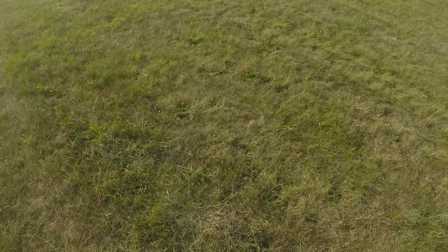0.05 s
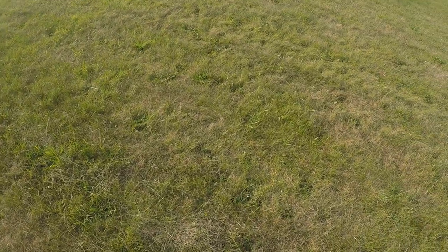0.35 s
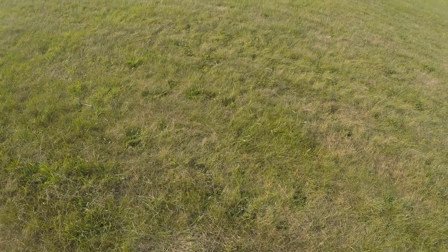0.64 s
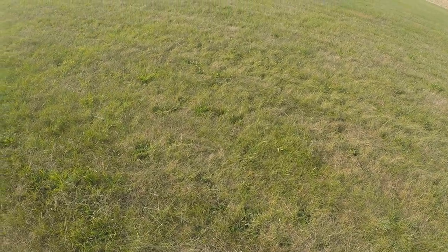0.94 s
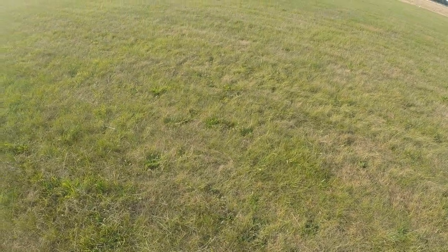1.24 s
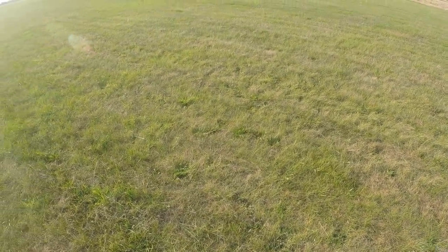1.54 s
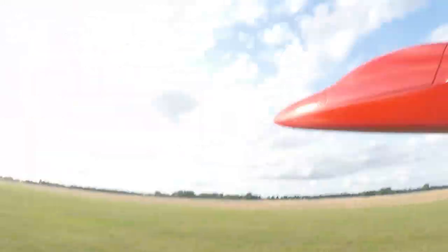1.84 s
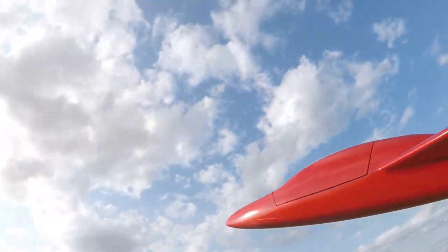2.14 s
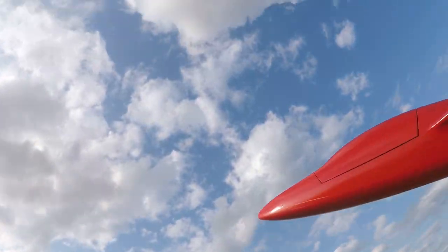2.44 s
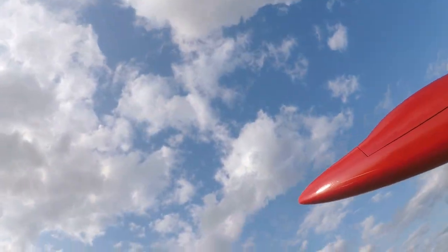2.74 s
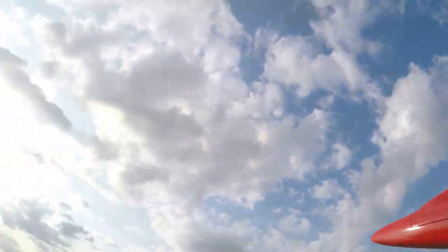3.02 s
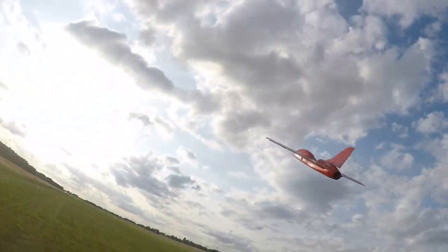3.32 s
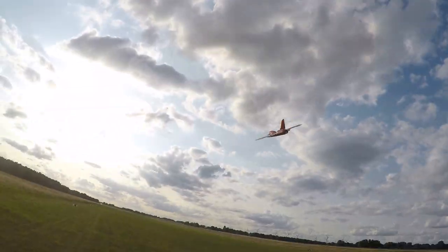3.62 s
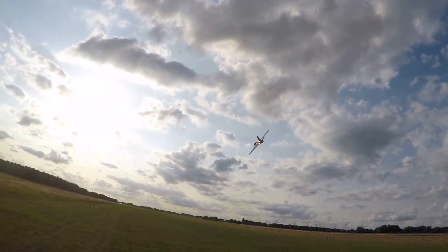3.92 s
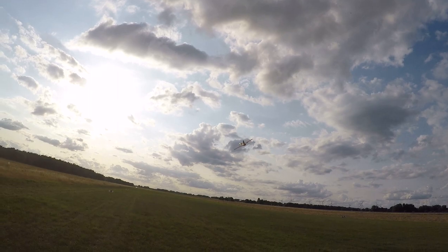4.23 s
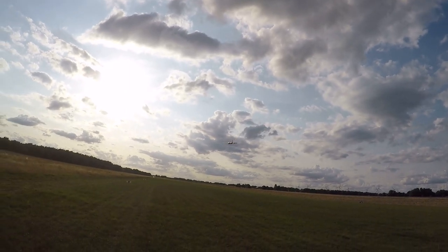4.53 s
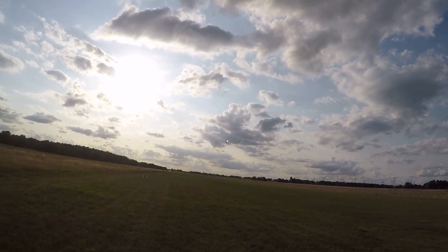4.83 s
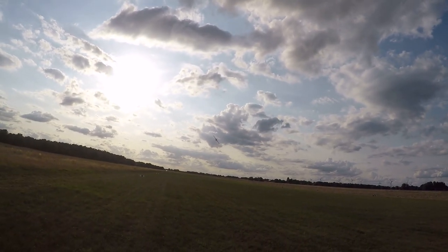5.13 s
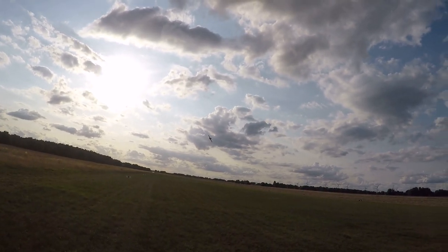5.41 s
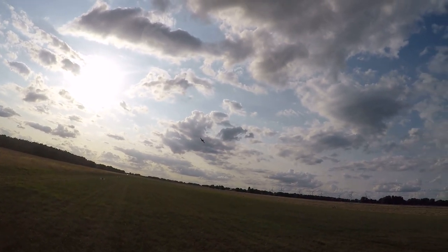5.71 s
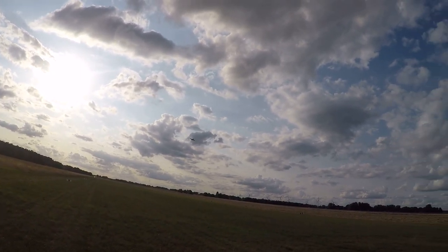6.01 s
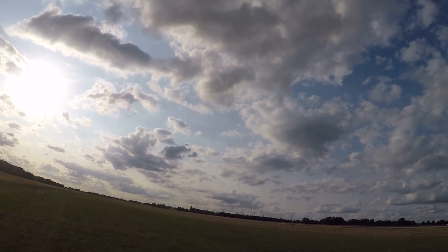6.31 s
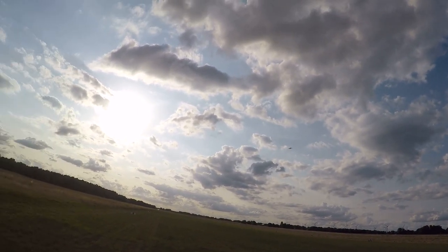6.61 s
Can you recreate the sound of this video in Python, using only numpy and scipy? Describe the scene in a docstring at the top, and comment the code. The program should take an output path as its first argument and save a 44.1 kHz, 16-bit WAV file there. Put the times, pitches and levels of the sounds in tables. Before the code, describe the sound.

In a quiet open field, a servo gives a brief buzz and something clicks. A small electric model jet stutters into life right beside the microphone and spools up quickly with a rising, growling whine. It holds a loud, high whistle over rushing air, then flies away, its pitch dropping slightly and its hiss sweeping and fading. Gusts of wind rumble on the microphone, with a few small knocks.

```python
"""A servo twitches in a quiet field, then an electric ducted-fan model jet stutters into life.
Its motor spools up under the 8 kHz whine of the speed controller; at full throttle the fan's
nine blades whistle over the rush of duct air. Thrown from beside a head-worn camera, the jet
flies off: its tones drop, a ground echo sweeps through its hiss, wind buffets the microphone."""
import sys
import numpy as np
from scipy import signal
from scipy.fft import rfft, irfft
from scipy.io import wavfile
from scipy.ndimage import map_coordinates

SR = 44100
rng = np.random.default_rng(int(sys.argv[2]) if len(sys.argv) > 2 else 0)


def output_pcm(signal):
    """Save a mono or channel-first signal as 16-bit PCM at the path in sys.argv[1].

    Samples are clipped to [-1, 1] before scaling.
    """
    pcm = np.clip(np.atleast_2d(signal).T, -1, 1) * 32767
    wavfile.write(sys.argv[1], SR, np.round(pcm).astype(np.int16))


N = 293706
T = np.arange(N) / SR
HZ = np.fft.rfftfreq(N, 1 / SR)
START_S, FULL_S, LAUNCH_S = 1.062, 1.487, 2.9  # motor start, full throttle, release


def amp(db):
    """Decibels to gain."""
    return 10 ** (np.asarray(db) / 20)


def unit(x):
    """Scale to rms 1."""
    return x / np.sqrt(np.mean(x ** 2) + 1e-20)


def pan(db):
    """Stereo gain curves for a left-minus-right (L-R) level."""
    db = db + np.zeros(N)
    return amp([db / 2, -db / 2])


def bell(x, centre, half_width):
    """Gaussian hump of height 1."""
    return np.exp(-.5 * ((x - centre) / half_width) ** 2)


def curves(rows):
    """Columns of a time table, per sample."""
    time_s, *columns = np.transpose(rows)
    return [np.interp(T, time_s, c) for c in columns]


def swells(rows):
    """Summed humps and dips, one dB curve per level column."""
    return sum(np.outer(db, bell(T, time_s, half_s)) for time_s, half_s, *db in rows)


def spectra(rows):
    """Columns of a frequency table, per bin."""
    hz, *columns = np.transpose(rows)
    return [np.interp(np.log(HZ + 1), np.log(hz + 1), c) for c in columns]


def colour(x, rows):
    """Shape the spectrum of x; rms 1."""
    return unit(irfft(rfft(x) * amp(spectra(rows)[0]), N))


def wander(hz):
    """Random drift up to a rate; rms 1."""
    return unit(irfft(rfft(rng.standard_normal(N)) / (1 + (HZ / hz) ** 4), N))


def noise_pair(likeness):
    """Two partly correlated white noises."""
    a, b = rng.standard_normal((2, N))
    return np.array([a, likeness * a + np.sqrt(1 - likeness ** 2) * b])


def tone(hz, lead_rad=0, pan_db=0):
    """Sine on a pitch curve; the left channel leads."""
    phase = 2 * np.pi * np.cumsum(hz) / SR
    return np.sqrt(2) * np.array([np.sin(phase + lead_rad), np.sin(phase)]) * pan(pan_db)


def noise_band(hz, width_hz, lead_rad, pan_db):
    """Narrow noise on a pitch curve."""
    carrier = np.exp(2j * np.pi * np.cumsum(hz + np.zeros(N)) / SR)
    band = (wander(width_hz) + 1j * wander(width_hz)) * carrier
    return np.array([(band * np.exp(1j * lead_rad)).real, band.real]) * pan(pan_db)


def comb(x, echo, delay_s, gain):
    """Add an echo with a moving delay, at about constant power."""
    late = np.array([map_coordinates(c, [(T - delay_s) * SR], order=3) for c in echo])
    return (x + gain * late) / np.sqrt(1 + gain ** 2)


def crossing(hz, peaks):
    """Gain of a pitch sweeping through resonances."""
    return sum(amp(db) * bell(hz, centre, width) for centre, width, db in peaks)


def running(attack_s=0.0045):
    """Gate: opens at motor start."""
    return np.clip((T - START_S) / attack_s, 0, 1)


def running_until(end_s, release_s):
    """Gate: open from motor start, shut by end_s."""
    return running() * np.clip((end_s - T) / release_s, 0, 1)


def background(hush_db=-48, whistle_hz=8620, pulse_hz=60):
    """Open-air hush and the faint pulsing whistle of the camera's electronics."""
    # quiet field (frequency [Hz], level [dB])
    field = [(12, -47), (20, -28), (53, -19), (102, -33), (135, -10), (159, -1.5), (277, -8), (432, -11),
             (539, -14.5), (1170, -18), (4930, -29), (5820, -26), (7680, -26), (8340, -25), (14900, -40)]
    hush = amp(hush_db + .5 * wander(3)) * colour(noise_pair(0.017), field)
    pulsing = 1 + 1.5 * np.sin(2 * np.pi * pulse_hz * T)
    return hush + amp(-66) * pulsing * tone(whistle_hz + 70 * wander(225), 1.0)


def wind():
    """Eddies at the microphone ports: shared rumble, looser flutter, single puffs."""
    # eddy spectra (frequency [Hz], level [dB])
    rumble_shape = [(10, -15.5), (25, -3), (40, 6), (55, 3.5), (80, -7.5), (130, -13.5), (300, -72)]
    flutter_shape = [(40, -25), (80, -4), (130, 3), (200, -4.5), (300, -9), (450, -18.5), (800, -22.5),
                     (2000, -54), (6000, -70)]
    # breeze, rising as the head lifts (time [s], rumble [dB], flutter [dB])
    breeze = [(2.0, -76, -68), (2.4, -51, -66), (3.0, -39, -36.5), (3.8, -41.5, -47), (4.6, -35.5, -42),
              (5.4, -33, -34.5), (6.66, -33.5, -45)]
    # gusts and lulls (time [s], half length [s], rumble [dB], flutter [dB])
    gusts = [(3.115, 0.031, 12, 10.5), (3.21, 0.045, 5.5, 4), (3.55, 0.14, 2.5, -26), (4.3, 0.08, 4, 2.5),
             (4.53, 0.033, 2.5, -1), (4.79, 0.1, 2, 6), (5.21, 0.047, 6, 8.5), (5.67, 0.013, 8.5, -3),
             (6.22, 0.06, 3.5, 5.5), (6.6, 0.11, 9.5, 5)]
    # air puffs (time [s], level [dB], frequency [Hz], half length [s])
    puffs = [(3.114, -16.5, 36.7, 0.0097), (3.125, -37, 128, 0.009), (3.237, -21, 150, 0.0028),
             (3.257, -22.5, 34, 0.018), (3.5, -15.5, 33.6, 0.012), (5.213, -32.5, 113, 0.016)]
    rumble_db, flutter_db = curves(breeze) + swells(gusts)
    rumble = colour(noise_pair(0.84), rumble_shape) * amp(rumble_db - 1)
    flutter = colour(noise_pair(0.31), flutter_shape) * amp(flutter_db + 2 * wander(13))
    exposure = np.interp(T, [2, 3, 4], [.2, .7, 1])
    out = rumble + exposure * flutter
    for time_s, db, hz, half_s in puffs:
        out -= amp(db) * bell(T, time_s, half_s) * np.sin(2 * np.pi * hz * (T - time_s))
    return out * np.interp(T, [1.9, 2.1], [0, 1]) * pan(-2)


def handling():
    """Small knocks, each ringing one hollow resonance."""
    # knocks (time [s], peak [dB], frequency [Hz], width [Hz], decay [s])
    knocks = [(0.6698, -28.5, 1440, 300, 0.0008), (.774, -43, 1500, 2000, 0.0047),
              (3.231, -23.5, 516, 590, 0.0048), (5.157, -26, 1570, 1700, 0.016),
              (5.161, -21.5, 4500, 1477, 0.0032), (6.279, -29, 1520, 1200, 0.0067)]
    out = np.zeros((2, N))
    for time_s, db, hz, width_hz, decay_s in knocks:
        burst = noise_pair(0.88) * np.exp(-abs(T - time_s) / decay_s) * (T >= time_s)
        body = signal.iirpeak(hz, hz / width_hz, fs=SR)
        ring = signal.lfilter(*body, signal.lfilter(*body, burst + 1e-15))
        out += amp(db) * ring / abs(ring).max()
    return out


def servo(start_s=.181, length_s=0.091, attack_s=0.044, release_s=0.02, teeth_hz=330):
    """A servo jerks, runs and stops: gear teeth click in a small plastic case."""
    # gearbox spectrum (frequency [Hz], level [dB])
    gears = [(180, -36), (300, -8), (415, 4), (492, -34), (690, -28), (818, 4), (898, -11), (1200, 2),
             (1850, -8), (2100, 0), (2800, -15), (3350, -7), (3800, -20), (8410, -18), (12000, -37),
             (15600, -65), (22000, -120)]
    age_s = np.clip(T - start_s, 0, length_s)
    run = np.minimum(age_s / attack_s, 1) * np.minimum((length_s - age_s) / release_s, 1)
    jerk = 1.6 * np.exp(-age_s / .003) * (T > start_s)
    tooth_phase = np.cumsum(teeth_hz * (1 + .1 * wander(40))) / SR % 1
    scrape = noise_pair(0.1) * (0.51 + np.exp(-tooth_phase / 0.22))
    return colour(scrape, gears) * amp(-39) * (run + jerk) * pan(-4)


def stutter(rate_hz=120, fade_s=0.08, uneven_db=4.5):
    """The controller jolts the standing rotor; each jolt rings the case, with little bass."""
    # motor case modes (frequency [Hz], level [dB], decay [s])
    modes = [(247, -10, 0.01), (514, 0, 0.014), (593, -11, 0.0094), (820, -14, .008), (1590, 0, .0025),
             (1850, -18, 0.0026)]
    age_s = np.maximum(T - START_S, 0)
    jolts = np.diff(np.ceil(age_s * rate_hz), prepend=0)
    jolts *= np.exp(-age_s / fade_s) * amp(uneven_db * wander(100))
    t = T[:SR // 10]
    ring = sum(amp(db) * np.exp(-t / decay_s) * np.sin(2 * np.pi * hz * t) for hz, db, decay_s in modes)
    ring = signal.sosfilt(signal.butter(4, [200, 2300], "band", fs=SR, output="sos"), ring)
    return amp(-32) * signal.oaconvolve(jolts, ring)[:N] * pan(-2)


def rattle(shaft_hz, smooth_hz=215):
    """The motor knocks in its case until it turns fast enough to run smoothly."""
    # case spectrum (frequency [Hz], level [dB])
    case = [(60, -45), (110, -2), (300, 11), (520, 10.5), (800, 1), (1200, -9), (1800, 14),
            (2400, -39), (7000, -7), (12000, -45)]
    knock_phase = np.cumsum(3 * shaft_hz) / SR % 1
    knocks = noise_pair(0.69) * (0.87 + np.exp(-knock_phase / 0.41))
    gain = amp(-36) * running_until(FULL_S, 0.23) / (1 + (shaft_hz / smooth_hz) ** 4)
    return gain * colour(knocks, case) * pan(-3)


def growl(shaft_hz):
    """Six uneven commutations a turn growl during spool-up, smeared by churning air."""
    # airframe resonances (frequency [Hz], half width [Hz], level [dB])
    peaks = [(1085, 160, -22.5), (2100, 510, -20), (3170, 490, -31), (4550, 350, -22.5)]
    commutation_hz = 6 * shaft_hz
    lower = 0.56 * noise_band(commutation_hz - shaft_hz, 210, -0.7, -12)
    upper = 0.23 * noise_band(commutation_hz + shaft_hz, 240, -1.8, -5)
    smear = 0.89 * noise_band(commutation_hz - shaft_hz / 2, 580, -1.1, -11)
    smear *= np.interp(shaft_hz, [300, 550], [.3, 1])
    beat = 1 + 0.33 * np.sin(2 * np.pi * np.cumsum(shaft_hz) / SR)
    flicker = amp(3 * wander(130))
    centre = noise_band(commutation_hz, 175, -1.7, -10)
    out = unit((centre + lower + upper + smear) * beat * flicker)
    out *= crossing(commutation_hz, peaks) * running_until(FULL_S, 0.012)
    # unevenness recurs each turn: shaft orders, blurring with speed
    repeat = np.interp(shaft_hz, [350, 600], [0.49, 0.12])
    return comb(out, out, 1 / shaft_hz, repeat)


def rasp(shaft_hz, width_hz=850):
    """A hissing band near twice the commutation rate sweeps up through the treble."""
    # airframe resonances (frequency [Hz], half width [Hz], level [dB])
    peaks = [(4100, 750, -28), (7200, 700, -22), (9900, 1900, -23.5)]
    hz = 12.5 * shaft_hz
    return crossing(hz, peaks) * running_until(1.53, 0.022) * noise_band(hz, width_hz, -1.8, -1.8)


def hum(shaft_hz, view):
    """Shaft unbalance hums once a turn, unsteadily while speeding up."""
    # shaft tone, strong from the side, weak from behind (time [s], level [dB])
    levels = [(1.4, -36.5), (1.48, -36), (1.55, -30.5), (2.0, -37.5), (2.55, -34), (3.12, -35), (3.26, -48),
              (3.4, -50), (4.5, -77), (5.15, -53.5), (5.8, -49), (6.66, -55)]
    # airframe resonance (frequency [Hz], half width [Hz], level [dB])
    peaks = [(324, 51, -28)]
    gain = amp(curves(levels)[0]) + crossing(shaft_hz, peaks)
    beside = np.interp(shaft_hz, [500, 850], [0, 1]) * np.interp(view, [0, 1], [1, .15])
    jitter_hz = np.interp(shaft_hz, [330, 520, 850], [9, 42, 0])
    hz = shaft_hz * (1 + 0.0013 * wander(25)) + jitter_hz * wander(111)
    orders = tone(hz, -2.2 * beside, 2 - 4 * beside) + amp(-11) * tone(2 * hz, 1.0)
    bass_rolloff = 1 / (1 + (175 / shaft_hz) ** 8)  # faint at low pitch
    return orders * gain * bass_rolloff * (1 + 0.024 * wander(35))


def controller(switching_hz=8050):
    """The speed controller's switching sings in the windings at part throttle."""
    gain = amp(-37 + 1.5 * wander(32.5)) * running(attack_s=0.072) * running_until(FULL_S, .2)
    return gain * tone(switching_hz + 5 * wander(41), -2.3, -12.5)


def duct():
    """Air rings the duct's hollows while the jet is beside the camera."""
    # resonances (frequency [Hz], width [Hz], level [dB], left lead [rad], L-R [dB])
    modes = [(4565, 255, -33, -0.92, -0.5), (5350, 280, -35, -1.6, -2), (6070, 160, -33.5, -1.4, -4)]
    # surges as the nozzle turns (time [s], half length [s], low [dB], middle [dB], high [dB])
    surges = [(1.88, 0.064, 7.8, 11, 5), (2.25, 0.12, 5.4, 1, 6), (2.82, 0.24, 8.2, 8.5, 2.5)]
    gate = running_until(3.2, .11) - running_until(FULL_S, 0.072)
    return gate * sum(amp(db + surge_db) * noise_band(hz, width_hz, lead_rad, pan_db)
                      for (hz, width_hz, db, lead_rad, pan_db), surge_db in zip(modes, swells(surges)))


def air_bands(shape, ports, hiss_hz=3200, sizzle_hz=8200):
    """Stereo fan noise from one direction: roar, hiss, sizzle, each at mid rms 1."""
    lead_rad, likeness = spectra(ports)
    level_db, pan_db = spectra(shape)
    coherence = np.clip(likeness * 1.346, 0, .98)
    a, b = rfft(rng.standard_normal((2, N)))
    left = a * np.exp(1j * lead_rad) * amp(level_db + pan_db / 2)
    right = (coherence * a + np.sqrt(1 - coherence ** 2) * b) * amp(level_db - pan_db / 2)
    spectrum = np.array([left, right]) / (1 + (110 / (HZ + 1)) ** 8)  # no deep bass
    low = 1 / (1 + (HZ / hiss_hz) ** 8)
    below_top = 1 / (1 + (HZ / sizzle_hz) ** 40)
    bands = irfft(np.array([spectrum * mask for mask in (low, below_top - low, 1 - below_top)]), N)
    return bands / bands.mean(1, keepdims=True).std(2, keepdims=True)


def rush(shaft_hz, view, distance_m):
    """Turbulent duct air: grows with fan speed, fades with distance, changes colour with the view."""
    # fan spectrum per view (frequency [Hz], level [dB], L-R [dB])
    beside = [(80, -64, 8), (150, -25.5, -3), (434, -16, 10), (673, -18, 6), (823, -8.5, -0.5),
              (1053, -3, -9), (1290, -9, -14), (2110, -12, -4), (2900, -21.5, -19.5), (3170, -15, -10),
              (3400, -20.5, -11.5), (3800, -14, -8.5), (4630, -12, -5), (5500, -9.5, -5), (5760, -4.5, -4),
              (6150, -8, -5), (7060, -2, 0.5), (7670, 0, -4), (7900, -4.5, 4), (8300, -3.5, -2),
              (9440, -9.5, -4.5), (10820, -3.5, 3), (11940, -17.5, -6), (13000, -14, 0), (13330, -22.5, 0),
              (14500, -47, 0)]
    passing = [(100, -24, -9), (450, -19, 16), (1010, 3, -5), (1500, -14.5, -9), (2460, -14, -4),
               (2840, -34, -9), (3160, -15, 0.0), (3500, -16.5, -16), (3900, -13.5, -5), (4300, -23, 1),
               (4700, -12, -2), (5000, -16, -6), (5560, -4, -3), (7440, 1.5, -6), (8300, -2, -4.5),
               (9000, -3, 5), (10800, -12, -3), (13200, -19, -2), (14500, -46.5, -1.0)]
    behind = [(100, -27, -4), (400, -12.5, 0), (954, -4, 7), (1220, -10.5, -12), (1760, 0, -1.5),
              (2250, -11.5, 2), (2800, -10, 3), (3210, -9, -18), (3660, -9, -5), (4050, 0, -5),
              (4460, 0, 1), (4950, 0.5, -2), (5800, 1.5, -3), (6470, 1.5, 1), (7690, 4, 13), (8220, -5, -4),
              (10130, -4.5, -3), (11200, -17.5, -3), (13600, -19.5, 0), (14500, -40, .5)]
    away = [(100, -13, -13), (554, -5, -5), (970, -2.5, 5), (1090, -12, -8), (1390, -4.5, -2.5),
            (1820, 1, 1), (2050, -3, 2.5), (2400, -4.5, 1), (2930, -8.5, 2), (3020, -7.5, -10.5),
            (3470, -7, -8), (4000, -3.5, 12), (4400, -6.5, -11), (5260, -6.5, -2), (6070, 0.5, 3.5),
            (6560, -1, 9), (7400, 0.5, 5), (8700, -5.5, -6.5), (9550, -10.5, -15), (10640, -19, -13),
            (11200, -38, 2), (14500, -25, -2)]
    # microphone ports per view (frequency [Hz], left lead [rad], likeness [0-1])
    beside_ports = [(400, .1, .85), (600, -.2, .7), (720, -2.2, .7), (1000, -2.7, .9), (1400, -3.3, .75),
                    (2000, -6.2, .75), (2500, -9.3, .55), (4000, -12.6, .65), (5000, -14.5, .75),
                    (5800, -13.9, .75), (8300, -14.5, .75), (9200, -15.6, .55), (11000, -16.2, .5),
                    (12200, -19, .1)]
    passing_ports = [(400, -.2, .6), (720, -2.2, .7), (1400, -3.3, .75), (2400, -8.8, .5),
                     (3900, -11.2, .6), (4900, -15.7, .7), (6300, -14.7, .7), (10200, -16.3, .55),
                     (12600, -21, .2)]
    behind_ports = [(400, 0, .7), (700, -.5, .75), (1000, -1.4, .68), (1500, -4.5, .62), (2100, -5.1, .7),
                    (2450, -8.6, .42), (2900, -7.9, .3), (3400, -6.5, .45), (4200, -6.5, .72),
                    (5000, -7.5, .62), (5800, -6.6, .62), (6800, -7, .35), (7600, -9, .5),
                    (8600, -10.2, .45), (9800, -9.8, .6), (11000, -12, .4)]
    away_ports = [(400, -.2, .3), (930, -.3, .45), (1100, -2.7, .45), (1600, -4.9, .8), (1950, -4.9, .72),
                  (2300, -3.1, .5), (2700, -1.9, .45), (3200, 0, .7), (5100, 0, .88), (5600, .6, .75),
                  (7400, .4, .8), (7800, 2.6, .7), (8700, 4, .7), (9700, 4.2, .65), (11000, 2, .35)]
    # roar, hiss, sizzle (level [dB], shaft onset [Hz], steepness [-], near range [m], fall [dB/decade])
    band_laws = [(-31, 154, 2.4, 0.28, 5.5), (-22, 280, 3.9, 1.86, 12), (-30, 420, 2.54, 2.2, 16)]
    # swings of the nozzle's beam (time [s], half length [s], roar [dB], hiss [dB], sizzle [dB])
    swings = [(1.4, 0.054, 0, 1.5, -4), (1.607, .12, 1, 0.5, 0.5), (1.927, 0.044, 2, 0, -2),
              (2.143, 0.17, -4, -1, 2), (2.418, 0.032, -0.5, -0.5, -0.5), (2.617, 0.11, 1, -1, 2),
              (2.908, 0.11, 1, -1.5, -4.5), (3.22, 0.061, -3, -4, 0.5), (3.27, 0.02, 1, -2.5, -0.5),
              (3.395, 0.09, 1.5, 1, 8), (3.718, 0.17, -2, -2, -1.5), (4.163, 0.11, 0, -1.5, -4),
              (5.372, 0.057, 2, 5, 3.5), (5.534, 0.072, 2.5, 0.5, 4.5), (5.75, 0.093, 2, 6, 12),
              (6.017, 0.12, 1, 2, 7.5), (6.389, 0.038, 0, -0.5, 0), (6.585, 0.074, 0, 3.5, 9.5)]
    views = [(beside, beside_ports), (passing, passing_ports), (behind, behind_ports), (away, away_ports)]
    bands = sum(np.sqrt(np.maximum(1 - abs(view - k), 0)) * air_bands(shape, ports)
                for k, (shape, ports) in enumerate(views))
    for band, swing_db, (db, onset_hz, steep, near_m, fall_db) in zip(bands, swells(swings), band_laws):
        loss_db = fall_db * np.log10(1 + distance_m / near_m)
        band *= amp(db + swing_db - loss_db) / (1 + (onset_hz / shaft_hz) ** steep)
    roar, hiss, sizzle = bands
    slow = running_until(FULL_S, 0.21)
    air = running() * (roar * amp(5 * slow) + (hiss + sizzle) * amp(0.7 * wander(25)))
    return comb(air, air, 1 / shaft_hz, 0.13 * slow)  # a slow fan chops the same eddies each turn


def turbulence(x, depth_db=1.36, patch_s=0.1, patch_hz=420):
    """Narrow patches of the spectrum swell and sink independently."""
    f, t, frames = signal.stft(x, SR, nperseg=512)
    rate_hz = np.fft.fftfreq(len(t), t[1])
    ripple_s = np.fft.fftfreq(len(f), f[1])[:, None]
    smooth = bell(rate_hz, 0, .5 / patch_s) * bell(ripple_s, 0, .5 / patch_hz)
    noise = rng.standard_normal((len(t), len(f))).T
    patches = unit(np.fft.ifft2(np.fft.fft2(noise) * smooth).real)
    return signal.istft(frames * unit(amp(depth_db * patches)), SR, nperseg=512)[1][:, :N]


def reflections(air, grass_hz=3000):
    """Moving echoes off the thrower's head and arm, then off grass, which absorbs treble."""
    # echo paths (time [s], delay [ms], gain [-])
    thrower = [(1.5, 1, .06), (1.92, 0.86, 0.099), (2.1, 0.82, 0.073), (2.4, 0.73, 0.095), (2.6, 0.96, .08),
               (3.1, 0.75, .12), (3.22, 0.71, 0.3), (3.36, 0.55, 0.17), (3.8, 0.51, 0.065)]
    ground = [(3.0, 9.5, 0.082), (3.5, 7.7, 0.38), (4.0, 5.06, 0.66), (4.5, 3.1, 0.6), (5.0, 2.2, 0.35),
              (6.0, 2.35, 0.25), (6.66, 3.1, 0.21)]
    delay_ms, gain = curves(thrower)
    air = comb(air, air, delay_ms / 1000, gain)
    pole = np.exp(-2 * np.pi * grass_hz / SR)
    dulled = signal.lfilter([1 - pole], [1, -pole], air)
    delay_ms, gain = curves(ground)
    return comb(air, dulled, delay_ms / 1000, gain)


def blade_whistle(shaft_hz, view, distance_m, blades=9, near_m=1.3):
    """Blade-pass tone: faint in spool-up, strong at full throttle, fading with distance."""
    # lobes and nulls sweeping over the camera (time [s], half length [s], level [dB])
    lobes = [(1.93, 0.015, 1), (2.06, 0.042, 4), (2.52, 0.093, -5), (2.93, 0.1, 5), (3.17, 0.036, 2.5),
             (3.32, 0.017, -12), (3.5, 0.05, 0), (3.75, 0.056, 7), (3.98, 0.24, -16), (4.48, 0.17, -19),
             (5.21, 0.023, -8), (5.35, 0.036, 5), (5.45, .015, -14), (5.78, 0.25, 9.5), (6.42, 0.043, -10),
             (6.58, .05, 6)]
    lead_rad = np.interp(view, [0, 1, 2, 3], [-2, -1, -2.5, 2])
    pan_db = np.interp(view, [0, 1, 1.93, 2.1, 3], [-1.5, -5, 10.5, -1, 4.5])
    onset = np.interp(shaft_hz, [482, 534, 700, 800], [0.014, .45, 0.55, 1])
    loss_db = 8 * np.log10(1 + distance_m / near_m)
    gain = onset * amp(-29 + swells(lobes)[0] - loss_db + 1.5 * wander(55))
    gain /= np.cos(lead_rad / 2)  # offsets phase cancellation in the mid
    waver_hz = 7 * wander(35) * np.interp(view, [2, 3], [1, .6])
    return gain * tone(blades * shaft_hz + waver_hz, lead_rad, pan_db)


def jet(sound_m_per_s=343):
    """Air, motor and blades; shaft-locked pitches are Doppler-shifted by the jet's motion."""
    # shaft spools up, then sags with the battery (time [s], rate [Hz])
    shaft = [(1.06, 45), (1.12, 85), (1.21, 232), (1.3, 405), (1.35, 510), (1.45, 675), (1.49, 835),
             (1.52, 896), (2.35, 883)]
    # arm swing, throw, acceleration (time [s], speed away [m/s])
    flight = [(2.45, 0), (2.68, -.8), (2.88, 2.6), (3.03, .3), (3.16, 1), (3.3, 8.6), (3.6, 14.2),
              (4.05, 15.7), (4.5, 18.6), (4.95, 25.6), (5.25, 27.1), (6.66, 28.7)]
    # aspect of the jet (time [s], view [0 beside, 1 passing, 2 behind, 3 away])
    aspect = [(3.06, 0.01), (3.19, 0.68), (3.26, 1.06), (3.36, 1.75), (3.5, 1.96), (4.2, 2.25), (5.0, 2.72)]
    speed_m_per_s, = curves(flight)
    view, = curves(aspect)
    distance_m = np.cumsum(speed_m_per_s * (T > LAUNCH_S)) / SR
    shaft_hz = curves(shaft)[0] / (1 + speed_m_per_s / sound_m_per_s)
    air = reflections(turbulence(rush(shaft_hz, view, distance_m)) + duct())
    motor = stutter() + rattle(shaft_hz) + growl(shaft_hz) + rasp(shaft_hz) + hum(shaft_hz, view)
    return air + motor + controller() + blade_whistle(shaft_hz, view, distance_m)


def scene():
    """Field, model jet and wind."""
    return background() + servo() + handling() + jet() + wind()


def record(dry, ceiling=.8, cutoff_hz=15050):
    """Soften the loudest peaks and cut the top treble."""
    rounded = dry / (1 + (dry / ceiling) ** 6) ** (1 / 6)
    lowpass = signal.firwin(511, cutoff_hz, window=("kaiser", 9), fs=SR)
    return signal.oaconvolve(rounded, lowpass[None], "same")


dry = scene()
out = record(dry)
output_pcm(out)
```